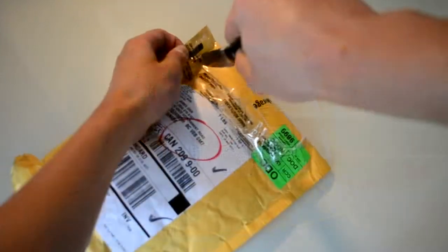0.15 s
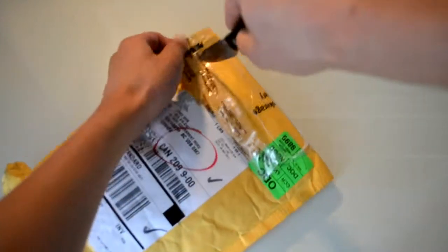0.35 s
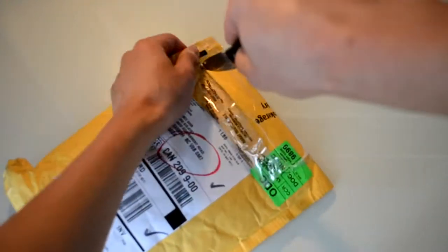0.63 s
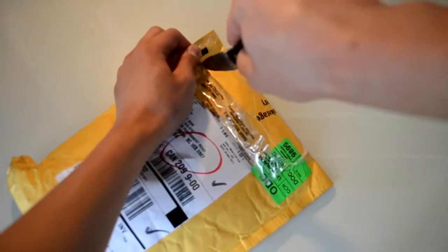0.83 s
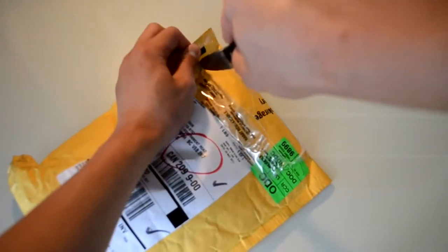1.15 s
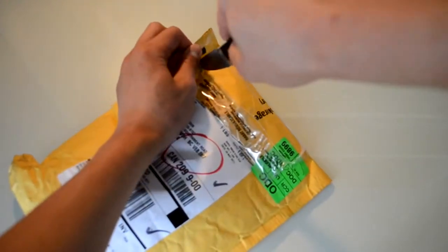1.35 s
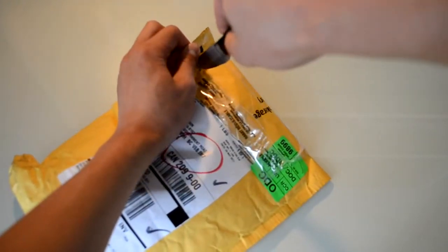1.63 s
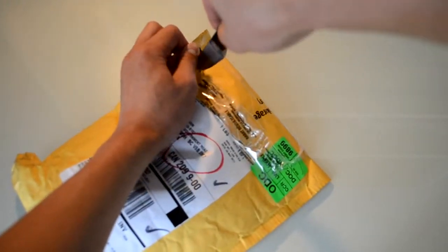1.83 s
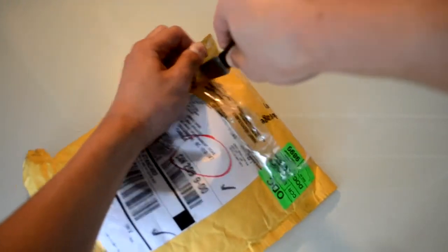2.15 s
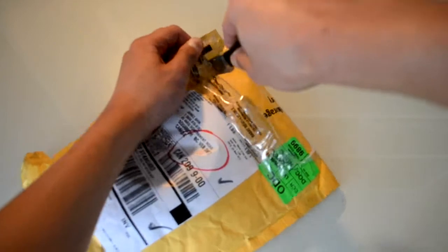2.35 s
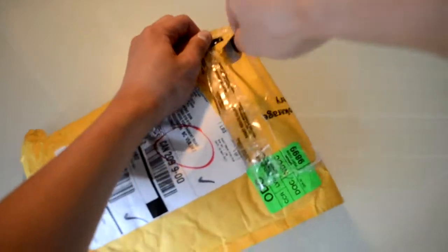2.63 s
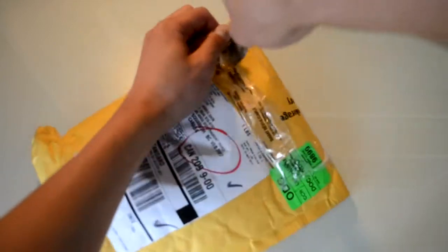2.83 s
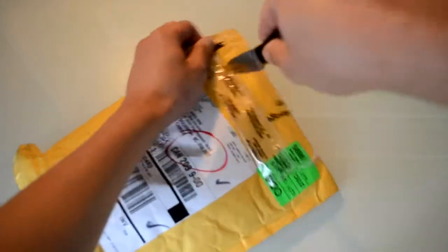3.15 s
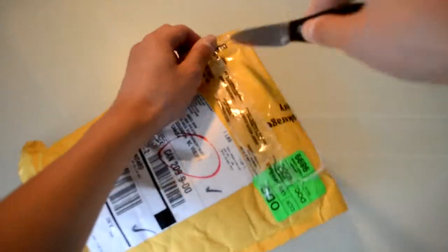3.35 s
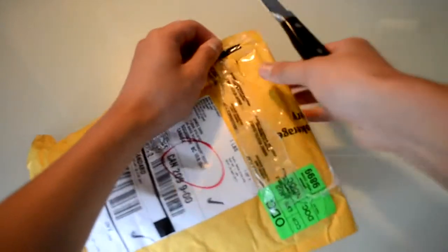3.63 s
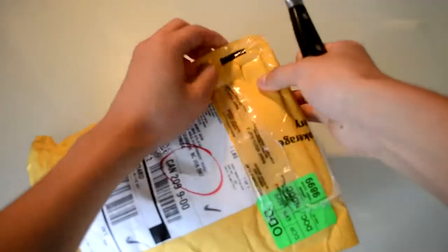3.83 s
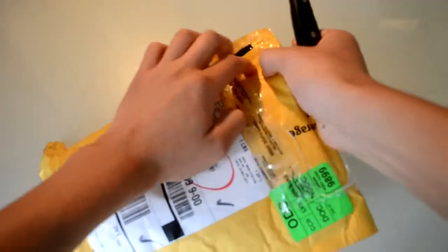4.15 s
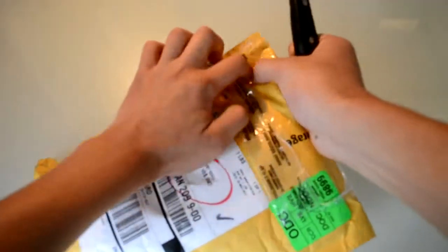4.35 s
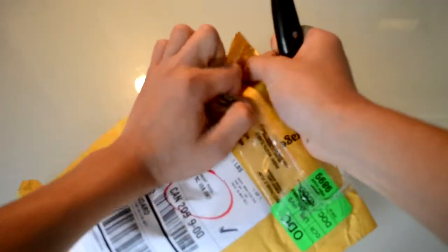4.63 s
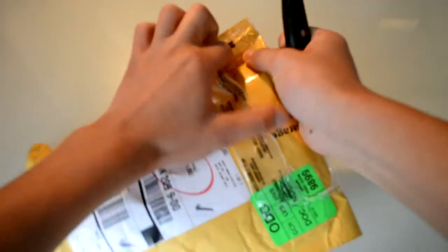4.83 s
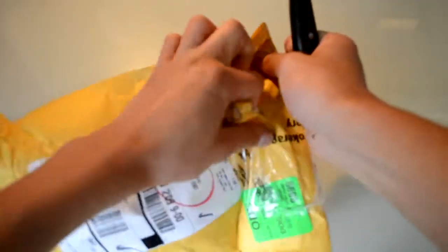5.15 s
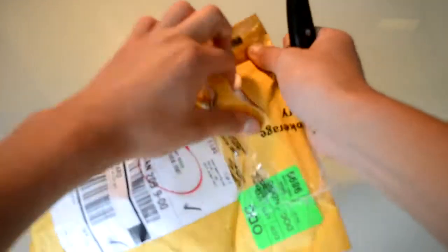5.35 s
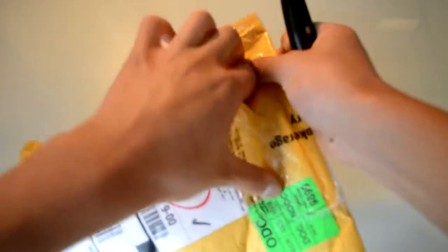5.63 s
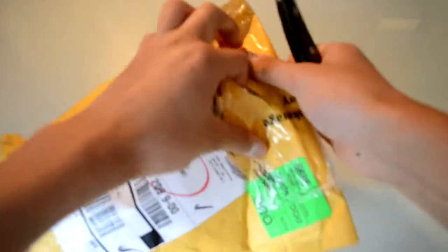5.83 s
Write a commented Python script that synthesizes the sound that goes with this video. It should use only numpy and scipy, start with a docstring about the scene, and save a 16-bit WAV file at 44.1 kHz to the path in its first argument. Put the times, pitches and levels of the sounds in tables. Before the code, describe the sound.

Close recording of a padded paper mailer with plastic film being worked by hand in a small quiet room. Faint separate ticks and crinkles come first, with a burst of pops near half a second and a short rustle past two seconds. After about four and a half seconds pulling grows forceful, with dense crackle and sharp loud snaps, still crinkling at the end.

```python
"""Creases snap one by one in a padded paper and plastic mailer as hands work a knife in, then pull it open.
Each snap is a ringing paper pop, a plastic tick of filtered noise and a dying run of crackle.
Small creases flip and fizz, a rustle of countless ticks follows the force of the hands,
and the blade rasps once. Sparse echoes and steady noise make the quiet room."""
import sys
import numpy as np
from scipy import signal
from scipy.io import wavfile

SR = 44100
rng = np.random.default_rng(int(sys.argv[2]) if len(sys.argv) > 2 else 0)


def materialize(psi):
    """Save the field psi as 16-bit PCM at rate SR to the path in sys.argv[1].

    A 1-D psi becomes a single channel; in a 2-D psi each row is a channel.
    """
    bounded = np.clip(np.atleast_2d(psi).T, -1, 1)
    quanta = np.round(bounded * 32767).astype(np.int16)
    wavfile.write(sys.argv[1], SR, quanta)


def to_linear_factor(level_db):
    """Convert decibel levels (scalar or array-like) to linear amplitude factors."""
    exponent = np.asarray(level_db, float) / 20
    return 10 ** exponent


N = 264203  # length [samples]

# creases that give way: (time [s], paper pop level [dB], pop pitch [Hz],
#                         plastic tick peak [dB], crackle level [dB])
SNAPS = [(0.26, -28.5, 2520, -24.5, -41), (0.4823, -26.5, 1750, -12.5, -20), (0.509, -63, 1700, -31, -22.5),
         (0.5146, -18, 1570, -35, -30.5), (0.554, -18.5, 1720, -10.5, -18), (0.592, -27, 1920, -13.5, -44),
         (0.667, -29, 1570, -16, -32), (0.6845, -24, 2590, -16.5, -31.5), (0.8871, -24.5, 1540, -27.5, -35),
         (1.0213, -33, 1380, -42, -34.5), (1.0415, -32, 1620, -36, -31.5), (1.445, -28.5, 1650, -41, -36.5),
         (1.638, -23, 2960, -24.5, -28.5), (2.102, -34.5, 1260, -21, -37), (2.2606, -31, 1780, -10, -26.5),
         (2.4915, -26.5, 1610, -26, -41), (2.6051, -16, 1500, -5, -18), (2.8982, -31, 1930, -19.5, -55),
         (2.9322, -20.5, 1970, -19.5, -24.5), (2.972, -48, 1970, -18.5, -36.5),
         (3.1906, -25.5, 1110, -45, -34.5), (3.22, -37, 2170, -12.5, -42), (3.249, -39, 2360, -15, -36),
         (3.4233, -31, 1680, -20, -37), (3.51, -24.5, 1560, -23.5, -29.5),
         (3.5762, -27.5, 1940, -14.5, -37), (3.665, -31.5, 1500, -27, -45), (3.7684, -28.5, 1430, -33, -42),
         (3.9358, -24, 2220, -18, -34), (3.968, -27.5, 1890, -22.5, -52), (4.029, -29, 2800, -19.5, -35),
         (4.2921, -31, 1300, -16, -33.5), (4.3912, -16, 3330, -11.5, -20),
         (4.441, -19.5, 2750, -12.5, -25.5), (4.514, -21.5, 1550, -27, -29.5),
         (4.5483, -23, 2690, -9.5, -32), (4.596, -17.5, 1460, -53, -46), (4.65, -16, 2000, -17, -30),
         (4.666, -11.5, 1500, -11.5, -20), (4.705, -20.5, 2060, -12, -24), (4.735, -20, 2100, -33, -21),
         (4.7453, -3.5, 3420, -5, -19), (4.756, -14, 2870, -5.5, -25), (4.9165, -24.5, 3450, -15.5, -32),
         (4.9692, -15, 1290, -40, -32), (5.1494, -18.5, 1400, -28, -30.5), (5.1874, -28, 1580, -18, -25.5),
         (5.1972, -2.5, 1980, 6, -12), (5.2946, -15.5, 1570, -13, -34), (5.3191, -6, 2050, -8, -18),
         (5.3575, -9.5, 1570, -3.5, -19), (5.3724, -9, 1560, -2.5, -16), (5.39, -17, 900, -24, -25.5),
         (5.4811, -22, 1530, -25.5, -30), (5.489, -19, 920, -24, -27.5), (5.551, -20, 1170, -16.5, -33),
         (5.6082, -27, 1330, -21, -30.5), (5.8486, -13, 1520, -19.5, -23.5), (5.882, -34, 1180, -24, -34.5),
         (5.9173, -15.5, 1330, -22, -17), (5.945, -35, 1440, -13, -36)]
# what the padded paper rings with: (frequency [Hz], time to fall 60 dB [s])
PAPER_MODES = [(700, 0.00047), (900, 0.009), (1220, 0.027), (1500, 0.022), (1880, 0.075), (2300, 0.0084),
               (2800, 0.011), (3400, 0.012)]
# broad tone of the paper, also used by its small creases, rustle and scrape: (frequency [Hz], level [dB])
PAPER_COLOUR = [(100, -52.5), (250, -8), (750, -6.5), (1500, -5), (2400, -7), (4000, -11.5), (6500, -34)]
# broad tone of the plastic film, also used by its small creases and rustle: (frequency [Hz], level [dB])
PLASTIC_COLOUR = [(1500, -30.5), (3000, -2), (4200, -0.84), (5600, -4), (7500, -7), (9200, -5.5),
                  (11000, -11.5)]
TICK_HZ, TICK_SPREAD_OCTAVES = 6430, 0.2  # median centre of the plastic ticks and its deviation
CRACKLE_SPREAD_DB = 3


def snaps():
    """Each crease pops the paper, ticks the plastic and sets off a dying run of crackle."""
    t = np.arange(round(0.06 * SR)) / SR
    mode_hz, mode_t60 = np.transpose(PAPER_MODES)[:, :, None]
    out = np.zeros(N)
    for s, paper_db, pitch_hz, plastic_db, crackle_db in SNAPS:
        tick_hz = TICK_HZ * 2 ** (TICK_SPREAD_OCTAVES * rng.standard_normal())
        paper_colour = colour(PAPER_COLOUR, centre_hz=pitch_hz, fall_db=7.5)
        plastic_colour = colour(PLASTIC_COLOUR, centre_hz=tick_hz, fall_db=9.0)

        # a crease stirs most the modes near its own size
        place_db, detune = rng.standard_normal((2, len(mode_hz), 1))
        near_db = -10 * abs(np.log2(mode_hz / pitch_hz)) + 3 * place_db
        swing = np.sin(2 * np.pi * mode_hz * (1 + 0.015 * detune) * t)
        ring = (to_linear_factor(near_db - 60 * t / mode_t60) * swing).sum(0)
        fold = to_linear_factor(-60 * t / 0.009) * np.sin(2 * np.pi * pitch_hz * t)
        pop = -0.6 * ring / abs(ring).max() - 0.59 * fold

        # the film lets go with one sharp pull and a very short burst
        slip = rng.standard_normal(len(t)) * to_linear_factor(-60 * t / 0.0044)
        slip[0] = -4.0
        tick = signal.oaconvolve(slip, plastic_colour)[:len(t)]

        # crackle starts just after the snap, more in whichever material snaps louder
        onset = np.clip((t - 0.0012) / 0.00066, 0, 1)
        run = ticks(6000, CRACKLE_SPREAD_DB, size=len(t)) * to_linear_factor(-60 * (t - 0.005) / 0.031) * onset
        plastic_share = 1 / (1 + to_linear_factor(0.88 * (paper_db - plastic_db) + 5.0))
        paper_run, plastic_run = (signal.oaconvolve(run, c / np.linalg.norm(c))[:len(t)]
                                  for c in (paper_colour, plastic_colour))
        plastic_run = plastic_run * to_linear_factor(-60 * t / 0.12)  # the film quiets before the paper
        crackle = (1 - plastic_share) * paper_run + plastic_share * plastic_run

        add(out, s, to_linear_factor(paper_db) * pop + to_linear_factor(plastic_db) * tick / abs(tick).max())
        add(out, s, to_linear_factor(crackle_db) * crackle)
    return out


def crease(hz, points):
    """One small crease: it flips at once, then fizzes briefly around its own pitch."""
    t = np.arange(round(0.04 * SR)) / SR
    fizz = rng.standard_normal(len(t)) * to_linear_factor(-60 * t / 0.025)
    fizz[0] = -2.0  # the flip
    return signal.oaconvolve(fizz, colour(points, centre_hz=hz, fall_db=7.5))


# the clearest small creases, each one flip in one colour: (time [s], peak [dB], centre [Hz])
CRINKLES = [(.299, -31, 2470), (.460, -30, 5900), (0.711, -37, 5550), (.794, -37, 2520),
            (.967, -33.5, 3790), (1.093, -36, 5500), (1.226, -32.5, 1600), (2.437, -27.5, 6400),
            (2.444, -28.5, 1200), (2.505, -28.5, 4330), (2.581, -27.5, 4530), (2.595, -27, 6040),
            (2.89, -32, 4450), (2.9158, -20, 4970), (2.926, -38, 6000), (3.47, -23.5, 5700),
            (3.485, -29.5, 2170), (3.549, -25.5, 5700), (3.996, -38, 1920), (4.056, -27, 1920),
            (4.09, -31, 5030), (4.369, -23, 6260), (4.437, -22, 6600), (5.2243, -19, 2500)]
CRINKLES_PER_S = 110  # in each material under gentle handling
CRINKLE_DB, CRINKLE_SPREAD_DB = -4.5, 3.5  # level relative to the effort, spread of sizes


def crinkles():
    """Small separate creases: the clearest at their moments, many more at random, each kind with its colour."""
    paper_db, plastic_db = effort()
    pull = np.clip((np.maximum(paper_db, plastic_db) + 45) / 14, 0, 1)
    per_s = CRINKLES_PER_S * (1 + 8 * pull)  # a hard pull runs them together
    out = np.zeros(N)
    for db, points, kinds_hz in ((paper_db, PAPER_COLOUR, np.geomspace(650, 3300, num=6)),
                                 (plastic_db, PLASTIC_COLOUR, np.geomspace(3600, 9500, num=6))):
        layer = np.zeros(N)
        for hz in kinds_hz:
            flips = ticks(per_s / len(kinds_hz), CRINKLE_SPREAD_DB, size=N)
            layer += signal.oaconvolve(flips, crease(hz, points))[:N]
        out += to_linear_factor(db + CRINKLE_DB) * evened(layer)
    for s, db, hz in CRINKLES:
        sound = crease(hz, PAPER_COLOUR if hz < PLASTIC_COLOUR[1][0] else PLASTIC_COLOUR)
        add(out, s, to_linear_factor(db) * sound / abs(sound).max())
    return out


def rustle():
    """Patches of paper and plastic tick in clumps, each in its own colour; hard pulls tick densely, evenly."""
    paper_db, plastic_db = effort()
    pull = np.clip((np.maximum(paper_db, plastic_db) + 51.0) / 22, 0, 1)

    # a clump starts at once and fades; one set is shared, the other seven belong to one patch each
    starts = (rng.random((N, 8)) < 90 / SR) * rng.random((N, 8))
    clumps = np.tanh(signal.lfilter([1], [1, -np.exp(-1 / (0.0043 * SR))], starts, axis=0))
    shared, *own = evened(clumps - clumps.mean(axis=0)).T

    out = np.zeros(N)
    for db, points, patches_hz, per_s, spread_db in (
            (paper_db, PAPER_COLOUR, (563, 1200, 1800, 2800), 500, 4.5),
            (plastic_db, PLASTIC_COLOUR, (4000, 6200, 9500), 800, 5.0)):
        layer = np.zeros(N)
        for hz in patches_hz:
            clump_db = (1 - 0.5 * pull) * (2.2 * shared + 2.8 * own.pop())
            clumped = ticks(per_s * (1 + 3 * pull), spread_db, size=N) * to_linear_factor(clump_db)
            layer += signal.oaconvolve(clumped, colour(points, centre_hz=hz, fall_db=5.0))[:N]
        out += to_linear_factor(db - 5.0) * evened(layer)
    return out


# changing force of the hands between and beneath the tugs:
# (time [s], paper effort [dB], plastic effort [dB])
HANDLING = [(0, -52.5, -60), (0.188, -47.5, -47.5), (.43, -55, -58.5), (.7, -49, -47.5),
            (1.05, -49.5, -51.5), (1.2, -54.5, -54), (1.6, -57, -48.5), (1.75, -62, -63),
            (2.103, -45, -45.5), (2.23, -50, -53), (2.85, -52.5, -56), (3.028, -42.5, -47.5),
            (3.12, -50, -59), (3.63, -52, -65), (3.75, -62, -70), (3.788, -43, -48), (4.3, -45.5, -46),
            (4.62, -39.5, -42), (4.9, -47, -49.5), (5.18, -39, -47), (5.46, -43.5, -48.5),
            (5.8, -41, -45.5), (5.99, -38.5, -39)]
# single cuts and tugs: (time at full force [s], time held [s], paper effort [dB], plastic effort [dB])
TUGS = [(0, 0.0024, -39.5, -39), (0.499, 0.077, -40.5, -41.5), (1.317, 0.1, -50, -48.5),
        (2.273, 0.035, -25, -29.5), (2.608, 0.056, -41.5, -41), (2.897, 0.017, -37.5, -42),
        (3.16, 0.087, -43, -39.5), (3.286, 0.019, -32, -35.5), (3.989, 0.051, -65, -41),
        (4.124, 0.022, -39.5, -43.5), (4.483, 0.027, -41, -42.5), (4.681, 0.062, -38.5, -32.5),
        (4.979, 0.0068, -31, -32), (5.198, 0.024, -31, -25.5), (5.279, 0.078, -29, -30.5),
        (5.51, 0.027, -37, -38)]
RISE_DB_PER_S, FALL_DB_PER_S = 799, 218


def effort():
    """Paper and plastic effort in dB: the handling plus every tug, which grips fast, holds, lets go slowly."""
    t = np.arange(0, N + 64, 64) / SR  # one value every 64 samples
    s, *handling_db = np.transpose(HANDLING)
    start, held, *tug_db = np.transpose(TUGS)[:, :, None]
    rise_db = RISE_DB_PER_S * (t - start)
    fall_db = FALL_DB_PER_S * (start + held - t)
    shape_db = np.minimum(0, np.minimum(rise_db, fall_db))
    levels = []
    for handling, tug in zip(handling_db, tug_db):
        power = to_linear_factor(np.interp(t, s, handling)) ** 2 + (to_linear_factor(tug + shape_db) ** 2).sum(0)
        levels.append(np.interp(np.arange(N) / SR, t, 10 * np.log10(power)))
    return levels


# the blade slides along the paper and rasps in one narrow band:
# (start [s], length [s], level before the swell [dB], centre [Hz])
SCRAPES = [(2.981, 0.073, -48.5, 2490)]


def scrapes():
    """Dense fine ticks in a narrow colour, swelling and fading over the stroke."""
    out = np.zeros(N)
    for s, length, db, hz in SCRAPES:
        u = np.linspace(0, 1, round(length * SR))
        narrow = colour(PAPER_COLOUR, centre_hz=hz, fall_db=46)
        rasp = signal.oaconvolve(ticks(5000, 2.1, size=len(u)), narrow)[:len(u)]
        add(out, s, to_linear_factor(db) * evened(rasp) * np.sin(np.pi * u ** 0.86))
    return out


def room(x, t60=0.2):
    """Sparse echoes of random sign, three sets taking turns so that successive snaps echo differently."""
    at = np.arange(90, round(0.4 * SR), 22)  # one echo in every 22 samples
    t, out = np.arange(N) / SR, np.zeros(N)
    for k in range(3):
        taps = np.zeros(round(0.41 * SR))
        places = at + rng.integers(0, 22, len(at))
        taps[places] = rng.choice([-1., 1.], len(at)) * to_linear_factor(-60 * at / SR / t60)
        turn = np.sqrt(2 / 3) * np.sin(np.pi * (t * 20 + k / 3))
        out += signal.oaconvolve(x * turn, taps / np.linalg.norm(taps))[:N]
    return out


# tone of the room noise: (frequency [Hz], level [dB])
AIR_COLOUR = [(21, -39), (85, -28.5), (125, -23), (859, -21.5), (5000, -29.5), (11000, -42), (22000, -120)]
AIR_DB = -58.5  # rms


def air():
    """Steady room noise: white noise filtered to the tone of the room."""
    noise = rng.standard_normal(N + 4096)
    return to_linear_factor(AIR_DB) * evened(signal.oaconvolve(noise, colour(AIR_COLOUR, size=8192), "valid")[:N])


def ticks(per_s, spread_db, size):
    """Random ticks of either sign, most small and a few large; the denser, the smaller."""
    chance, large, sign = rng.random((size, 3)).T
    big_db = spread_db * np.minimum(-np.log(large + 1e-9), 4)
    struck = chance < per_s / SR
    return evened(to_linear_factor(big_db) * np.sign(sign - 0.5) * struck / np.sqrt(per_s))


def colour(points, size=2048, centre_hz=1000, fall_db=0):
    """Causal filter with the spectrum of the points, falling by fall_db an octave either side of a centre."""
    f, db = np.transpose(points)
    hz = abs(np.fft.fftfreq(size, 1 / SR)) + 1
    shape_db = np.interp(np.log(hz), np.log(f + 1), db) - fall_db * abs(np.log2(hz / centre_hz))
    # minimum phase: the energy comes as early as it can
    spectrum = np.exp(np.conj(signal.hilbert(shape_db * np.log(10) / 20)))
    return np.fft.ifft(spectrum).real[:size // 2]


def evened(x):
    """Scales to rms 1."""
    return x / np.sqrt(np.mean(x ** 2) + 1e-20)


def add(mix, s, sound):
    """Mixes a sound in at time s."""
    part = mix[round(s * SR):][:len(sound)]
    part += sound[:len(part)]


def scene():
    """The mailer, its echoes and the room noise."""
    mailer = snaps() + crinkles() + rustle() + scrapes()
    bass_cut = signal.butter(4, 309, "high", fs=SR, output="sos")  # a small sheet radiates no bass
    mailer = signal.sosfilt(bass_cut, mailer)
    return (mailer + to_linear_factor(-8.5) * room(mailer) + air())[None]


def roll_off(x):
    """The treble ends steeply here."""
    return signal.sosfilt(signal.butter(12, 16230, fs=SR, output="sos"), x)


DIP_HZ, DIP_WIDTH_HZ = 7910, 340  # the microphone port cancels a narrow band
EDGE_HZ = 11155  # upper band limit


def record(dry):
    """The loudest snaps overload the microphone, which leaves a low thud;
    then a narrow dip near 7.9 kHz and an upper band limit near 11 kHz."""
    clipped = np.clip(dry, -0.92, 0.68)
    dipped = signal.lfilter(*signal.iirnotch(DIP_HZ, DIP_HZ / DIP_WIDTH_HZ, SR), clipped)
    band_limit = signal.firwin(151, EDGE_HZ, window=("kaiser", 8), fs=SR)
    mix = signal.oaconvolve(dipped, band_limit[None], "same")
    return roll_off(mix)


dry = scene()
out = record(dry)
materialize(out)
```